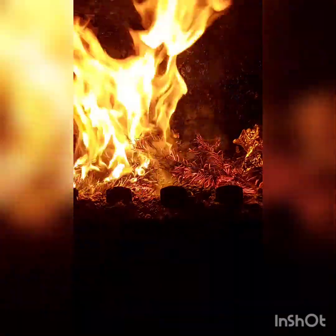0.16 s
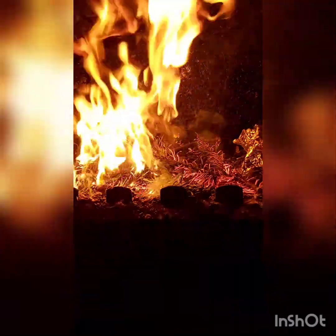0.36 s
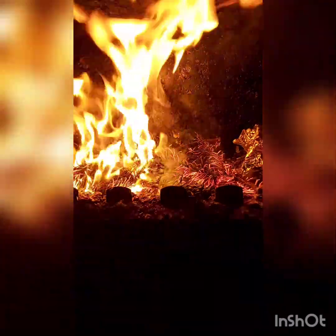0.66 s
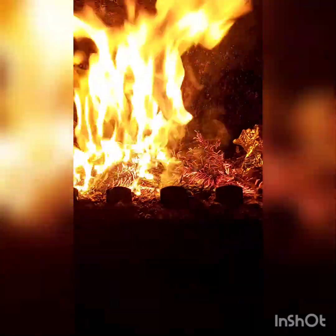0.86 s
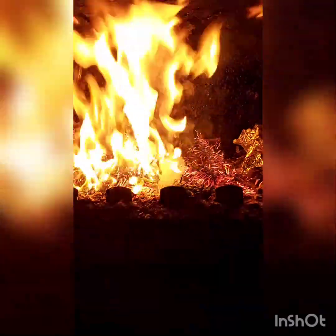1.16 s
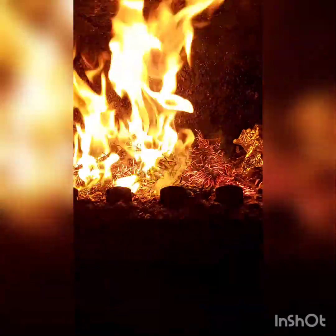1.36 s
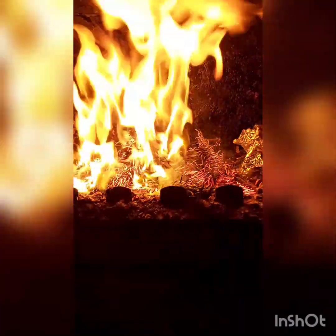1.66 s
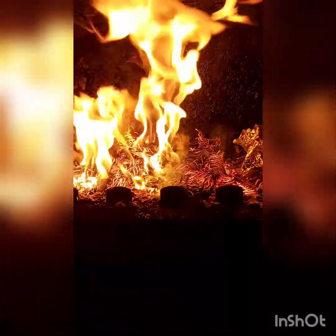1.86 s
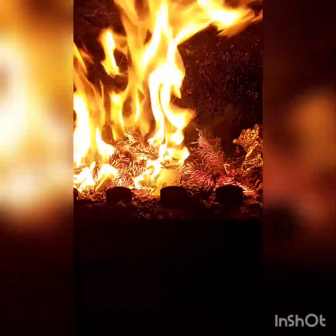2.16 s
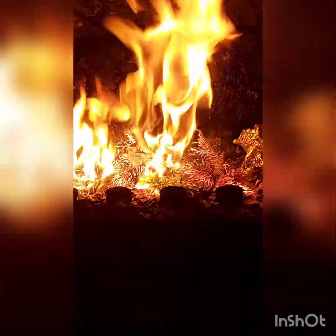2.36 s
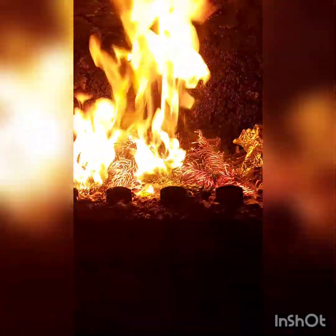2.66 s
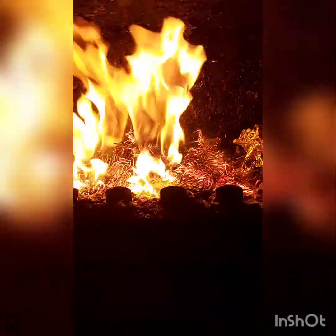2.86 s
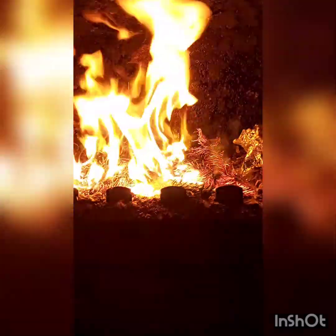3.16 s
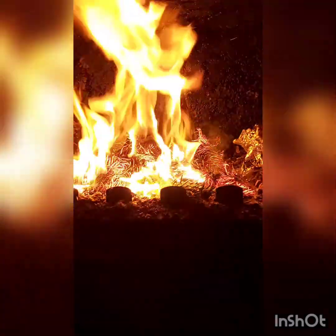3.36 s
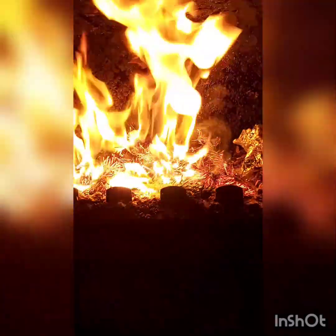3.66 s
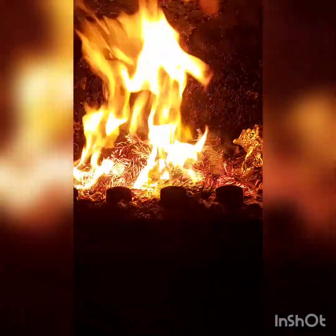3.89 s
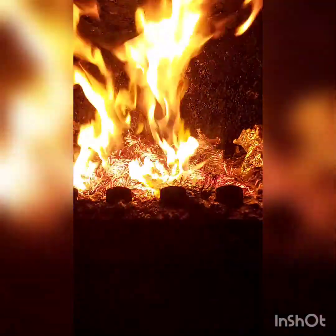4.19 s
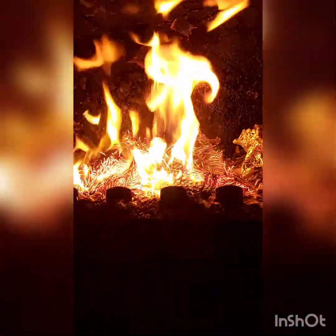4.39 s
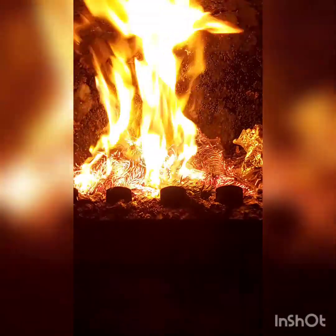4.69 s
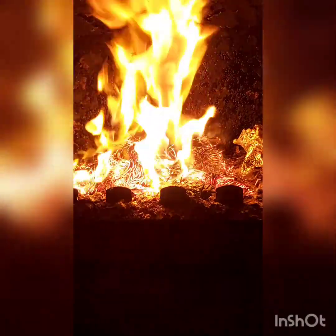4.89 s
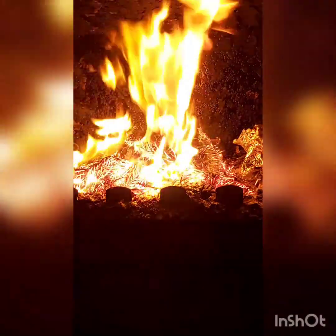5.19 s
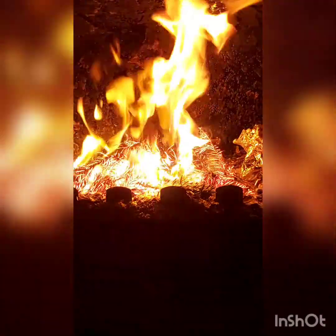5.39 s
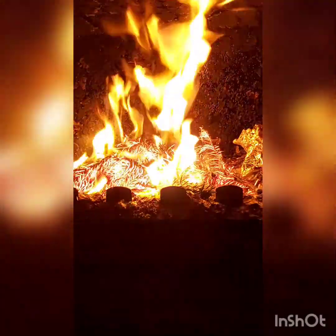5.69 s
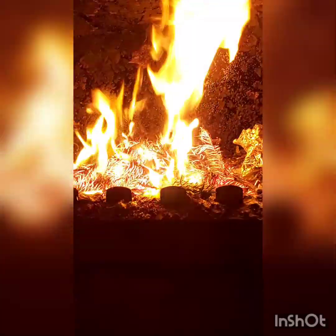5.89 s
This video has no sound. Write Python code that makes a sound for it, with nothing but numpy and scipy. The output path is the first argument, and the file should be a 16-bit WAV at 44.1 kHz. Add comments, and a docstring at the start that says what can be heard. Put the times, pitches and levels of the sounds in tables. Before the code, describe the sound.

A fireplace fire of resinous branches snaps and pops above a soft flame rumble, with a few low thuds and a faint sizzle.

```python
"""Sharp pops and low thuds break from resinous fir branches burning in a stone hearth.
Each pop is a bursting sap pocket, an impulse that echoes off the hearth walls and dies in the room;
each thud is a gas pocket flaring. Beneath them the turbulent flame rumbles in the flue and flutters,
needles snap and hiss as they burn down, and steam whistles thinly out of a crack in a twig.
The fire is heard through two microphone ports, left and right."""
import sys
import numpy as np
from scipy import signal
from scipy.fft import rfft, irfft
from scipy.io import wavfile

SR = 44100
rng = np.random.default_rng(int(sys.argv[2]) if len(sys.argv) > 2 else 0)


def to_wav(s):
    """Save 16-bit WAV."""
    ch = np.atleast_2d(s).T  # columns
    pcm = np.round(np.clip(ch, -1, 1) * 32767)  # PCM
    wavfile.write(sys.argv[1], SR, pcm.astype(np.int16))


N = 266364


# Bursting sap pockets. Each row: time in seconds, then in dB the drive of the mid, body, knock and high
# bands and the left-right balance.
SAP_BURSTS = [(0.0142, -14, -32.5, -19, -8.5, 5.5), (0.1283, -37, -37.5, -31, -42, 0),
              (0.1336, -29.5, -55, -34.5, -33, -0.5), (0.2365, -19.5, -35, -19, -15, 3.5),
              (0.2996, -18, -41, -21, -10.5, 1), (0.857, -47, -51, -38, -57, 3),
              (0.8845, -19, -38, -21.5, -12.5, 1.5), (0.994, -32, -38.5, -28.5, -24, 2.5),
              (1.048, -28.5, -45.5, -67, -22.5, 0.5), (1.2354, -43.5, -46.5, -53, -48, 1),
              (1.3532, -36, -49, -39, -43, -3), (1.9324, -28, -42.5, -41, -23, 4),
              (1.9616, -29, -39.5, -27.5, -27.5, -0.5), (2.015, -35, -51, -37, -27, -1),
              (2.162, -30.5, -40, -32, -34, 0), (2.411, -20.5, -36.5, -25.5, -13.5, 4.5),
              (2.4998, -50.5, -62, -63, -54, 0), (2.7206, -28.5, -41, -29, -28.5, 4),
              (3.033, -42, -49, -44, -43, 7), (3.0579, -24, -31.5, -35, -24, 3),
              (3.1548, -49.5, -43, -37.5, -53, 1.5), (3.7626, -17, -38.5, -30, -15.5, 3.5),
              (3.8172, -42.5, -34, -30, -51, 0), (4.205, -35.5, -55, -38.5, -34, 0),
              (4.402, -38, -68, -50.5, -28.5, 2.5), (4.9651, -19.5, -35.5, -40, -12, 2),
              (5.0992, -14.5, -35, -22.5, -8, 1)]
# Single needles snapping, treble only. Each row: time in seconds, drive in dB.
NEEDLE_SNAPS = [(0.6589, -57), (0.75, -46), (1.1433, -44), (1.2885, -47), (1.31, -40.5), (1.509, -34.5),
                (1.662, -44), (1.885, -54), (2.3306, -42), (2.884, -44), (3.3687, -42.5), (3.8856, -42),
                (3.9594, -49), (3.981, -43), (4.1854, -42.5), (4.27, -42), (4.3717, -41), (4.545, -43.5),
                (4.8232, -44), (4.8732, -38.5), (5.3074, -56), (5.4025, -45), (5.496, -48), (5.545, -45.5),
                (5.572, -45), (5.6943, -44), (5.8052, -47), (5.9924, -51)]

def crackle(hiss_db):
    """Impulse excitation: each burst or snap is convolved with the hearth's response at one of five spots."""
    s, mid_db, body_db, knock_db, high_db, pan_db = np.transpose(SAP_BURSTS)
    body, knock, mid, high = (clicks(s, db, pan_db) for db in (body_db, knock_db, mid_db, high_db))
    patter_db = hiss_db + 1.8 * np.minimum(rng.exponential(1, N), 3)
    patter = from_db(patter_db) * (rng.random(N) < 70 / SR)   # about 70 faint ticks a second
    s, snap_db = np.transpose(NEEDLE_SNAPS)
    tick = clicks(s, snap_db - 9, pan_db=7.5) + patter * from_db([[-4], [-13]])
    high += clicks(s, snap_db - 7, pan_db=7.5) + patter * from_db([[-10], [-19]])
    spots, out = rng.integers(0, 5, N), 0
    for spot in range(5):
        here = spots == spot
        bursts = from_db(30) * band(body * here, 1244, "low")
        bursts += from_db(19) * band(knock * here, [1200, 2500], "band")
        bursts += from_db(12.5) * band(mid * here, [2500, 9000], "band")
        bursts += from_db(6) * band(high * here, 9100, "high")
        bursts += from_db(15) * band(tick * here, [4200, 9000], "band")
        out = out + signal.oaconvolve(bursts, hearth_response(), axes=1)[:, :N]
    return out


# Direct sound and first echoes off the stone. Each row: delay in milliseconds, left and right gain in dB.
EARLY_ARRIVALS = [(0, 14, 6.5), (.7, 1.5, -47), (1.35, -6, -54), (2.3, 3.5, -17), (3.2, 6, -24)]
# Colour of the crackle. Each row: frequency in Hz, gain in dB.
CRACKLE_SPECTRUM = [(260, -19), (450, -19), (591, -12), (1120, -10.5), (1930, 1.5), (2140, -7), (2990, -9),
                    (4170, -2), (4780, -9), (5320, -6.5), (6190, -11.5), (7760, -16), (12800, 2),
                    (15600, -3.5), (16800, -26)]
# Lean of the crackle. Each row: frequency in Hz, left minus right in dB.
CRACKLE_LEAN = [(60, -12.5), (110, -7.5), (200, -10), (380, -3), (700, -8), (1290, -4), (2380, -5),
                (4400, -3.5), (8120, 3.5), (15000, -2.5)]
LEAD_IN = 64   # samples of room for the colouring to ring ahead of a click

def hearth_response():
    """Reverberation: discrete echoes, a dense short ring, then the room's exponentially decaying tail."""
    s = np.arange(round(.4 * SR)) / SR
    late = np.maximum(s - .02, 0)   # the tail holds until the far walls have answered
    ring, tail = rng.standard_normal((2, 2, len(s)))
    ring_db, ring_t60_s, room_db = -7, .026, -27.5
    response = ring * from_db(ring_db - 60 * s / ring_t60_s)
    for edge_hz, kind, t60_s in (2160, "low", .2), ([2800, 9000], "band", .21), (9900, "high", .12):
        response += band(tail, edge_hz, kind) * from_db(room_db - 60 * late / t60_s)
    response *= s > .0004
    for ms, left_db, right_db in EARLY_ARRIVALS:
        delay = round(abs(ms + rng.normal(0, .05)) * SR / 1000)
        response[:, delay] += from_db([left_db, right_db])
    return coloured(np.roll(response, LEAD_IN, axis=1), CRACKLE_SPECTRUM, CRACKLE_LEAN) * (s < .3)


# Gas pockets flaring. Each row: start in seconds, drive in dB, ring frequency in Hz.
FLARES = [(0.044, -6.5, 144), (0.158, -25, 140), (0.352, -14.5, 167), (0.671, -20.5, 155),
          (3.054, -20, 141), (3.477, -16, 149), (3.822, -10.5, 165), (4.058, -22.5, 175),
          (5.715, -24.5, 163), (5.923, -21.5, 202)]

def thuds():
    """Damped resonance: a sudden flare pushes the air once and the flue rings for about two cycles."""
    out, age = np.zeros(N), np.arange(round(.1 * SR)) / SR
    for s, db, hz in FLARES:
        start = round(s * SR)
        envelope = age / .0047 * np.exp(1 - age / .0023)
        ring = envelope * np.sin(2 * np.pi * hz * age)
        out[start:start + len(age)] -= from_db(db) * ring[:N - start]
    return out


# Course of the rumble. Each row: time in seconds, level in dB.
RUMBLE_LEVELS = [(0.0, -27.5), (0.05, -27.5), (0.12, -34), (0.18, -26), (0.27, -34.5), (0.44, -28.5),
                 (2.1, -36), (2.37, -30), (2.4, -36), (3.04, -33.5), (3.08, -28), (3.16, -39.5),
                 (3.62, -32), (3.77, -46.5), (3.83, -26.5), (3.87, -32.5), (4.2, -42.5), (4.31, -34),
                 (4.49, -45), (4.81, -36), (5.45, -45), (5.74, -40), (5.82, -45.5), (6.04, -40)]
# Colour of the rumble. Each row: frequency in Hz, relative spectral density in dB.
RUMBLE_SPECTRUM = [(12, -49), (20, -20), (45, -19.5), (59, 6), (91, -6), (123, 3), (147, -8), (184, 1.5),
                   (236, -6), (295, -16.5), (344, -13), (384, -26), (501, -25.5), (560, -35.5), (730, -64),
                   (1230, -120)]

def rumble():
    """Turbulence in the flue: noise with a few low spectral peaks rises and falls with the flame."""
    level_db, = in_time(RUMBLE_LEVELS)
    return from_db(level_db) * flame_noise(RUMBLE_SPECTRUM, flicker_db=2.17, flicker_hz=15.4)


# The flutter sinking as the needles burn down. Each row: time in seconds, dull and bright drive in dB.
BURN_LEVELS = [(0.0, -57, -63), (0.2, -59.5, -55), (0.72, -59.5, -66), (1.01, -58, -60), (1.8, -67, -71),
               (2.07, -66, -71), (3.01, -64, -72), (3.16, -70.5, -68), (3.63, -68, -75), (6.04, -80.5, -76)]
# Puffs of gas catching fire. Each row: start and length in seconds, dull and bright drive in dB.
GAS_PUFFS = [(0.129, 0.094, -55, -53.5), (0.342, 0.069, -52, -47), (0.465, 0.12, -62, -58),
             (0.554, 0.07, -54, -49.5), (0.796, 0.15, -64, -53), (1.085, 0.028, -59, -50),
             (1.235, 0.034, -59, -54), (1.426, 0.063, -58, -67), (1.673, 0.03, -57, -53.5),
             (2.308, 0.046, -53, -58.5), (2.495, 0.023, -51, -64), (2.65, 0.027, -57, -64),
             (2.717, 0.15, -60.5, -54.5), (2.849, 0.1, -62, -79), (2.995, 0.097, -55, -60),
             (3.095, 0.057, -58, -51), (3.448, 0.13, -56.5, -58), (3.808, 0.056, -56, -55),
             (4.346, 0.058, -73, -71), (4.542, 0.059, -59.5, -57.5), (4.607, 0.13, -70, -88),
             (5.117, 0.2, -68, -80), (5.677, 0.091, -66, -82), (5.924, 0.029, -69.5, -67)]
# Colour of the flutter. Each row: frequency in Hz, relative spectral density in dB.
FLUTTER_SPECTRUM = [(260, -14.5), (450, 0), (507, -9), (640, -11), (703, -5.5), (766, -7), (864, -6.5),
                    (974, -10), (1080, -17), (1270, -11), (1520, -17), (1890, -10), (2180, -21.5),
                    (3210, -17), (3500, -2), (4550, -36), (7700, -120)]

def flutter(burn_db):
    """Amplitude modulation: each puff swells two bands of flame noise quickly, then fades."""
    gains = from_db(burn_db)
    for s, length, dull_db, bright_db in GAS_PUFFS:
        start, size = round(s * SR), round(length * SR)
        progress = np.arange(size) / size
        swell = np.sin(np.pi * progress ** .6)
        gains[:, start:start + size] += from_db([[dull_db], [bright_db]]) * swell[:N - start]
    dull, bright = (flame_noise(FLUTTER_SPECTRUM, flicker_db=1.5, flicker_hz=25) for _ in range(2))
    dull = from_db(6) * band(dull, 1250, "low")
    bright = from_db(5) * band(bright, [1300, 2500], "band")
    return gains[0] * dull + gains[1] * bright


# Colour of the hissing needles. Each row: frequency in Hz, relative spectral density in dB.
SIZZLE_SPECTRUM = [(1470, -7), (2500, -1), (2910, -3.5), (4160, 0.5), (4510, -1.5), (9030, -12.5),
                   (11600, -2), (15200, -2.5), (16200, 8), (16800, -69)]
SIZZLE_DB, SIZZLE_FOLLOWS = -63.5, .37   # level at mean burn; the treble's share of the burn's fall in dB

def sizzle(fall_db):
    """Broadband noise: needles hiss less as they burn down, the dull end dying faster than the bright."""
    hiss = from_db(SIZZLE_DB) * flame_noise(SIZZLE_SPECTRUM, flicker_db=2, flicker_hz=29.8)
    dull, bright = (band(hiss, 3620, kind) for kind in ("low", "high"))
    return from_db(.93 * fall_db) * dull + from_db(SIZZLE_FOLLOWS * fall_db) * bright


# Steam jets. Each row: drive of the octave in dB, then a list of points, each with time in seconds,
# pitch in Hz and drive of the fundamental in dB.
STEAM_JETS = [ (-84, [(3.45, 4300, -80), (3.55, 3850, -77), (3.6, 4700, -79), (3.65, 3800, -78),
              (3.74, 4300, -77)]), (-82, [(4.44, 5300, -80), (4.52, 5500, -80), (4.6, 5750, -77),
              (4.65, 5400, -78), (4.70, 5950, -76)]), (-81, [(4.71, 5050, -78), (4.76, 5340, -72),
              (4.79, 5050, -78), (4.85, 5700, -73), (4.87, 5100, -76), (4.96, 5000, -76), (5.04, 4600, -80),
              (5.09, 5100, -76)]), (-80, [(5.2, 4990, -78), (5.27, 5400, -70), (5.4, 5100, -74),
              (5.47, 5250, -71), (5.55, 5040, -76), (5.63, 5180, -76), (5.69, 5030, -76), (5.77, 5200, -72),
              (5.8, 5600, -75)]), (-77, [(5.8, 5700, -80), (5.83, 6050, -82), (5.93, 6150, -83),
              (5.99, 6250, -80), (6.04, 6050, -82)]), (-100, [(5.7, 4250, -86), (5.86, 4200, -83),
              (5.93, 4300, -77), (6.02, 4350, -82)]), ]

def whistles():
    """Jet oscillation: steam leaving a crack sounds a wavering tone and its octave, stronger on the left."""
    out, silent_db = np.zeros(N), -150
    for octave_db, points in STEAM_JETS:
        hz = in_time(points)[0] * (1 + .012 * drift(200) + .01 * drift(30))
        db = in_time(points, outside=silent_db)[1]
        phase = 2 * np.pi * np.cumsum(hz) / SR
        octave = (db > silent_db) * from_db(octave_db + 3.5 * drift(25)) * np.sin(2 * phase)
        out += from_db(4 * drift(30)) * (from_db(db) * np.sin(phase) + octave)
    return out * from_db([[6.5], [-3.5]])


# Likeness of the flame noise at the two ports. Each row: frequency in Hz, correlation from -1 to 1.
PORT_CORRELATION = [(60, 0.97), (130, 1), (290, 0.9), (640, -0.0016), (1410, 0.94), (3100, 0.16),
                    (6820, 0.13), (15000, -0.34)]
# Lean of the flame noise. Each row: frequency in Hz, left minus right in dB.
FLAME_LEAN = [(60, 0.5), (110, -1.5), (200, -2), (380, -2.5), (700, 4), (1290, 0), (2380, -2), (4400, 5.5),
              (8120, 25.5), (15000, 8)]

def flame_noise(spectrum, flicker_db, flicker_hz):
    """Partial coherence: flickering turbulent noise, most alike at both ports in the bass; mono rms 1."""
    mid, side = rfft(rng.standard_normal((2, N)))
    alike = np.clip(in_frequency(PORT_CORRELATION, N), -1, 1)
    pair = irfft(np.sqrt(1 + alike) * mid + np.sqrt(1 - alike) * side * np.array([[1], [-1]]), N)
    pair = coloured(pair, spectrum, FLAME_LEAN) * from_db(flicker_db * drift(flicker_hz))
    return pair / rms(pair.mean(axis=0))


def clicks(s, db, pan_db):
    """Ideal impulses: one per event at both ports, set early by the lead-in of the hearth's response."""
    train = np.zeros((2, N))
    starts = np.maximum((s * SR).astype(int) - LEAD_IN, 0)
    train[:, starts] = panned(db, pan_db)
    return train


def coloured(x, spectrum, lean):
    """Spectral shaping: two channels take on a colour and a left-right balance."""
    size = x.shape[1]
    return irfft(rfft(x) * panned(in_frequency(spectrum, size), in_frequency(lean, size)), size)


def drift(rate_hz):
    """Low-passed noise: a slow random wander of unit rms."""
    step, settle = 40, 2000   # samples per step; steps for the filter to settle
    pole = np.exp(-2 * np.pi * rate_hz * step / SR)
    noise = rng.standard_normal(N // step + settle + 2)
    slow = signal.lfilter([1], [1, -2 * pole, pole * pole], noise)[settle:]
    return np.interp(np.arange(N) / step, np.arange(len(slow)), slow / rms(slow))


def in_time(rows, outside=None):
    """Linear interpolation of a curve's columns, sample by sample."""
    s, *columns = np.transpose(rows)
    return [np.interp(np.arange(N) / SR, s, column, outside, outside) for column in columns]


def in_frequency(rows, size):
    """Interpolation of a curve over log frequency, bin by bin."""
    hz, values = np.transpose(rows)
    bin_hz = np.maximum(np.fft.rfftfreq(size, 1 / SR), 1)
    return np.interp(np.log(bin_hz), np.log(hz), values)


def band(x, edge_hz, kind):
    """Third-order Butterworth filter."""
    return signal.sosfilt(signal.butter(3, edge_hz, kind, fs=SR, output="sos"), x + 1e-18)


def panned(db, pan_db):
    """Level difference: left and right gains, pan_db apart."""
    return from_db(db + pan_db * np.array([[.5], [-.5]]))


def from_db(db):
    """Decibels to gain."""
    return 10 ** (np.asarray(db) / 20)


def rms(x):
    """Root mean square."""
    return np.sqrt(np.mean(x ** 2) + 1e-20)


def scene():
    """Superposition: all sources add; flutter, sizzle and faint patter sink with the same burn."""
    burn_db = in_time(BURN_LEVELS)
    fall_db = burn_db[0] - burn_db[0].mean()
    hiss_db = SIZZLE_DB + SIZZLE_FOLLOWS * fall_db
    return rumble() + crackle(hiss_db) + flutter(burn_db) + sizzle(fall_db) + thuds() + whistles()


def record(dry):
    """Path difference and saturation: the farther right port hears later; peaks round off, the top is cut."""
    lag_samples, ceiling, cutoff_hz = 6, .75, 16500
    ports = np.array([dry[0], np.roll(dry[1], lag_samples)])
    rounded = ceiling * np.tanh(ports / ceiling)
    return signal.sosfilt(signal.cheby2(14, 60, cutoff_hz, fs=SR, output="sos"), rounded)


dry = scene()
out = record(dry)
to_wav(out)
```